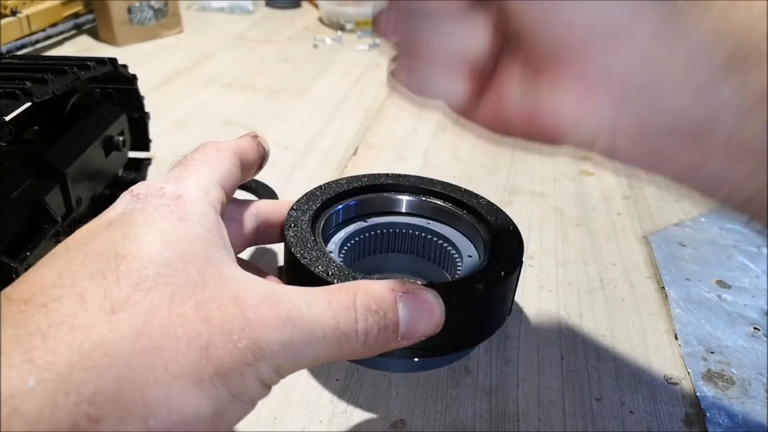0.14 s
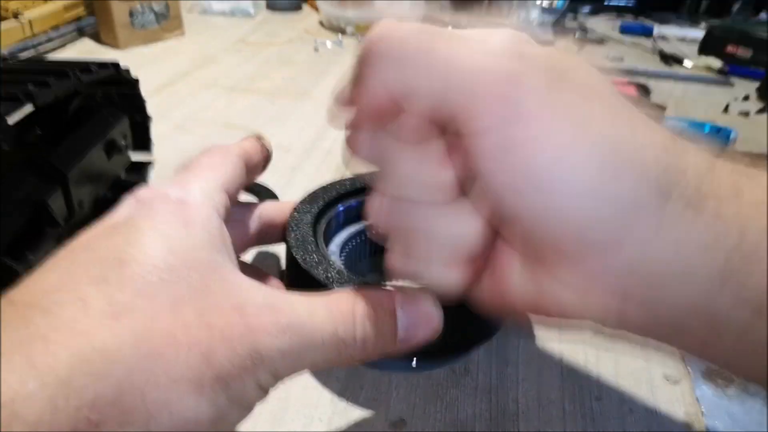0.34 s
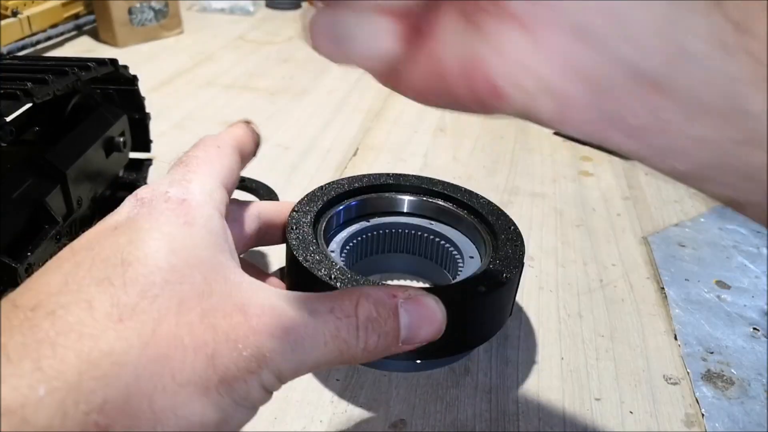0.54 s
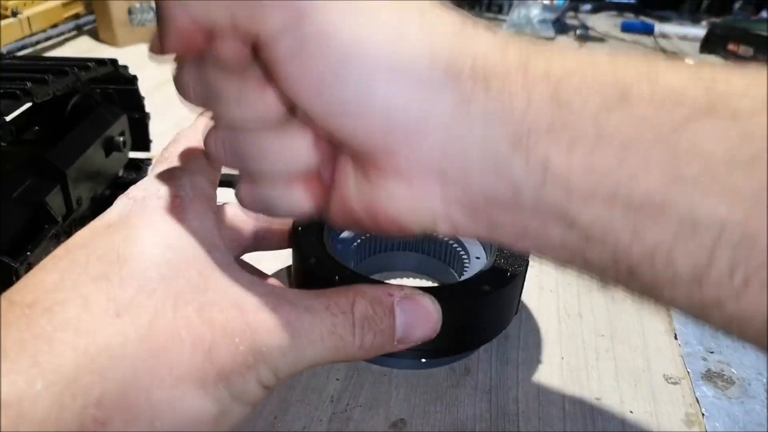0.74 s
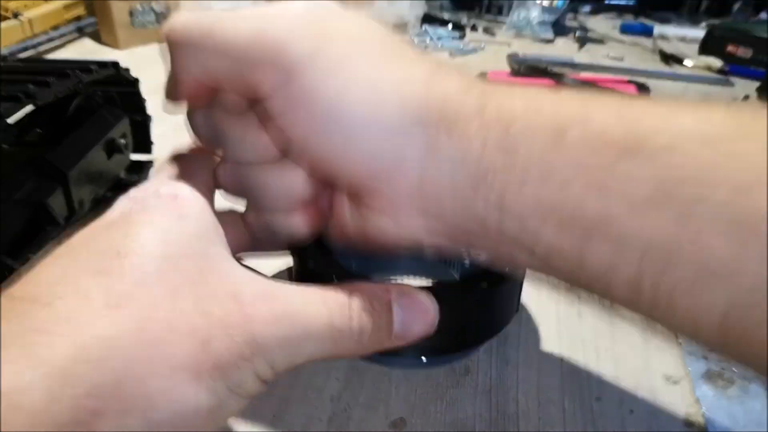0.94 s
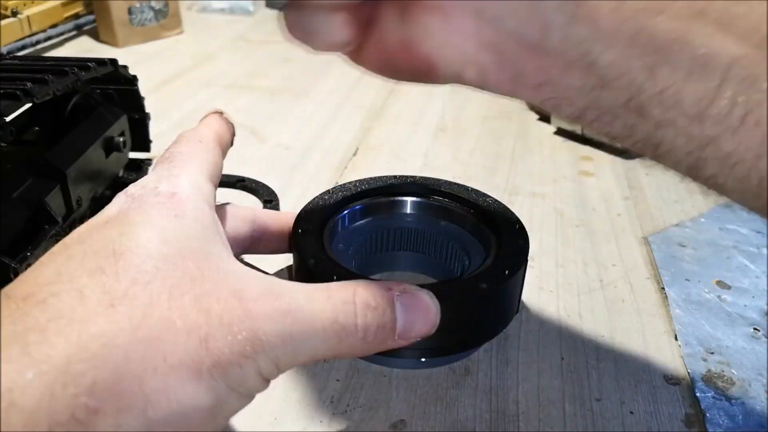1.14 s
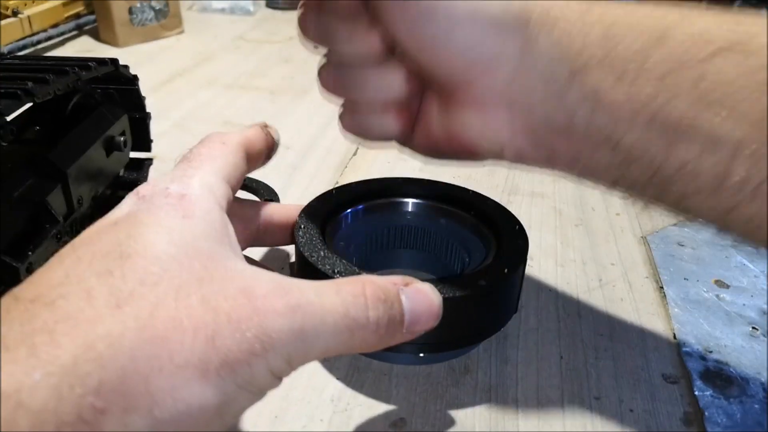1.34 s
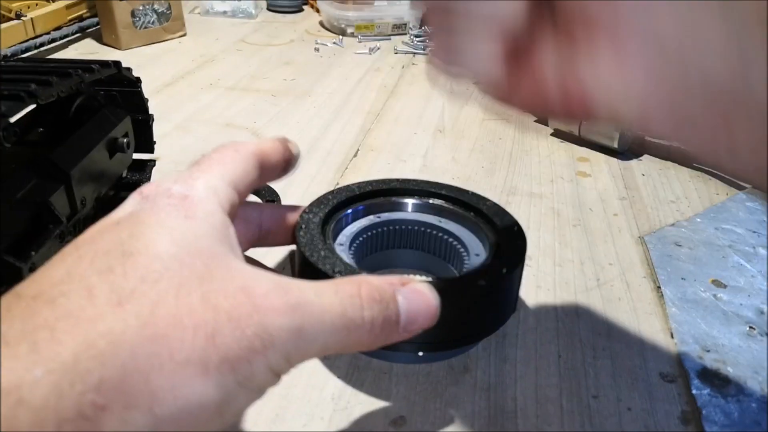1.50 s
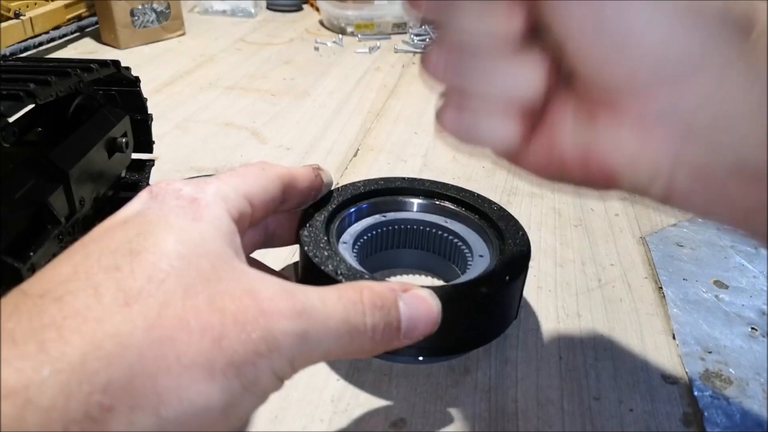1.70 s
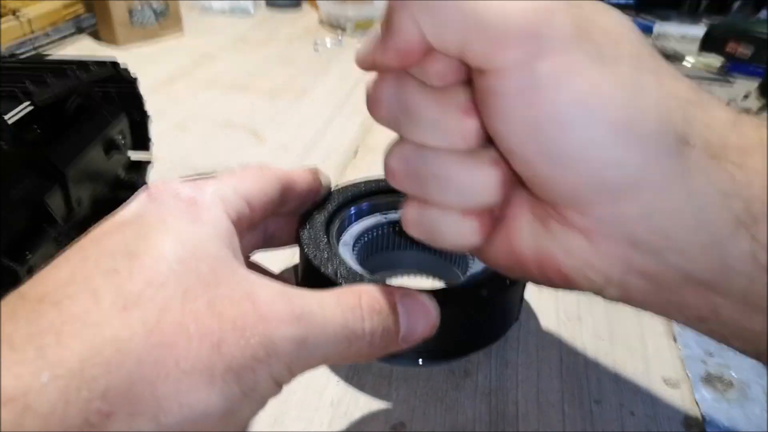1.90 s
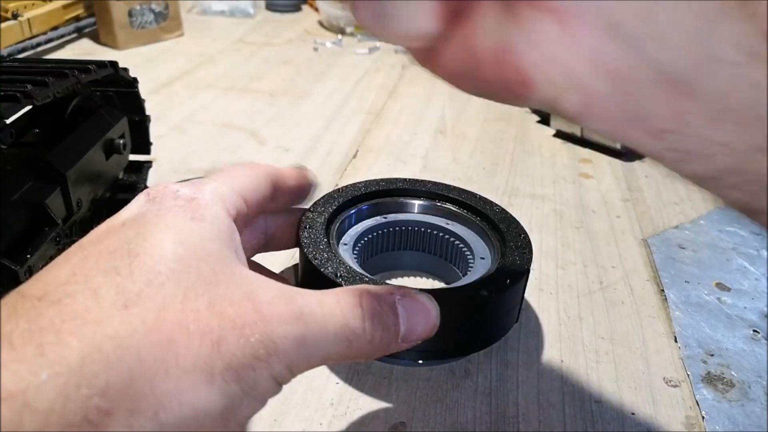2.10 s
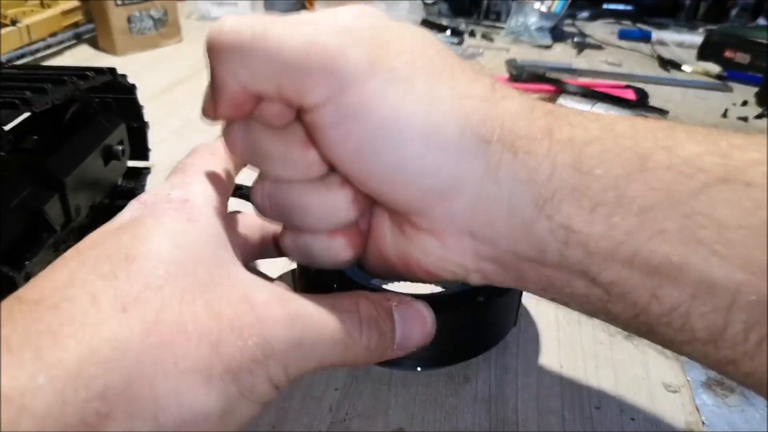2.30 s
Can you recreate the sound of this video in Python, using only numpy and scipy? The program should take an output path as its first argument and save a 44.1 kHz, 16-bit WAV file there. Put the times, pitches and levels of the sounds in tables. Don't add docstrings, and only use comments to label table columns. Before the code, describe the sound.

Fist pounding a hard plastic ring on a wooden workbench, close up in a garage: seven blows at about 0.2, 0.5, 0.83, 1.11, 1.41, 1.75 and 2.04 seconds. Each is a deep thud and hollow knock with a dry plastic crack, then rattling tools, small clinks and a short boomy tail. The last has the deepest thud and longest rattle. Faint skin rubbing and low rumble lie between.

```python
import sys
import numpy as np
from scipy import signal
from scipy.fft import rfft, irfft, next_fast_len
from scipy.io import wavfile
from scipy.ndimage import uniform_filter1d, map_coordinates

SR = 44100
rng = np.random.default_rng(int(sys.argv[2]) if len(sys.argv) > 2 else 0)


def nominal_scale(level):
    x = np.asarray(level, float) / 20
    return 10 ** x


def store_wav(level_fs):
    pcm = np.round(np.clip(np.atleast_2d(level_fs), -1, 1) * 32767)
    wavfile.write(sys.argv[1], SR, pcm.T.astype(np.int16))


N = 103635


def unit(x):
    return x / np.sqrt(np.mean(x ** 2) + 1e-20)


def along(points, hz):
    f, value = np.transpose(points)
    return np.interp(np.log(hz + 1), np.log(f + 1), value)


def octaves(hz):
    return np.log2((hz + 1) / 2000)


def since(s):
    return np.maximum(np.arange(N) / SR - s, 0)


def level(rows):
    return nominal_scale(np.interp(np.arange(N) / SR, *np.transpose(rows)))


def filtered(x, response):
    m = next_fast_len(N + SR // 2)
    return irfft(rfft(x, m) * response(np.fft.rfftfreq(m, 1 / SR)), m)[..., :N]


def wobble(rate):
    knots = rng.standard_normal(int(N / SR * 400) + 4)
    return map_coordinates(knots, [np.arange(N) * min(rate, 400) / SR])


def noise(spectrum, tilt_db=0, alike=None):
    # f/Hz, left-right likeness (correlation, 0 to 1)
    usual_likeness = [(100, 1), (300, 0.65), (600, 0.27), (2000, 0.14), (10000, 0.053)]
    likeness = alike or usual_likeness

    def mid_side_gain(hz):
        angle = np.arccos(np.clip(along(likeness, hz), -1, 1)) / 2
        colour_db = along(spectrum, hz)
        gain = nominal_scale(colour_db + tilt_db * octaves(hz) * (colour_db > -100))
        return gain * [np.cos(angle), np.sin(angle)]

    mid, side = filtered(rng.standard_normal((2, N)), mid_side_gain)
    return unit(np.array([mid + side, mid - side]))


def swing(s, db, hz, rise_s, power):
    u = since(s) / rise_s / power
    return -nominal_scale(db) * (u * np.exp(1 - u)) ** power * np.sin(2 * np.pi * hz * since(s))


def ringing(s, db, modes, attack_s):
    t = since(s)
    out = np.zeros(N)
    for hz, mode_db, t60 in modes:
        decay = nominal_scale(db + mode_db + rng.normal(0, 1.5) - 60 * t / t60)
        out += decay * np.sin(2 * np.pi * (hz * t + rng.random()))
    return out * (1 - np.exp(-t / attack_s))


def room(x, decay, size):
    hz, t, z = signal.stft(rng.standard_normal((2, SR // 2)), SR, nperseg=size)
    tail = signal.istft(z * nominal_scale(-60 * t / along(decay, hz)[:, None]), SR, nperseg=size)[1]
    return signal.fftconvolve(x[None], tail / np.linalg.norm(tail[0]), axes=1)[:, :N]


def ports(x):
    # f/Hz, left-right level/dB
    shading = [(300, 0.5), (650, 4), (1000, -3.5), (1500, -5), (2400, 3), (8000, 9)]
    lag_s = 0.0003043
    half = np.array([[.5], [-.5]])
    return filtered(x, lambda hz: np.exp(2j * np.pi * hz * lag_s * half) * nominal_scale(along(shading, hz) * half))


def background():
    # t/s, level/dB
    rub_levels = [(0, -61.5), (.1, -63.5), (.19, -67.5), (.31, -54), (.45, -65.5), (.62, -60), (.8, -67),
                  (.95, -65), (.985, -93), (1.1, -77.5), (1.26, -79), (1.33, -67), (1.42, -83),
                  (1.6, -74.5), (1.72, -70), (1.95, -71), (2.19, -65.5), (2.35, -72)]
    # f/Hz, density/dB per Hz
    skin_colour = [(320, -45.5), (550, -15), (951, -14.5), (1310, -16), (2200, -7.5), (2840, -18),
                   (4500, -20.5), (5500, -17), (6230, -23.5), (10800, -30), (14000, -56.5), (22000, -120)]
    # t/s, level/dB
    sway_levels = [(0.0, -51), (0.61, -44.5), (1.13, -48), (1.32, -42), (2.05, -43), (2.35, -44)]
    # f/Hz, density/dB per Hz
    rumble_colour = [(15, 17), (35, 31.5), (60, 15), (110, -35)]
    # t/s, level/dB
    stir_levels = [(0, -50), (.08, -68.5), (.19, -66), (.45, -65), (.8, -66.5), (1.0, -64.5), (1.1, -62.5),
                   (1.4, -58.5), (1.62, -55.5), (1.74, -68.5), (2.03, -62.5), (2.22, -53.5), (2.35, -69)]
    # f/Hz, density/dB per Hz
    air_colour = [(35, -37), (60, -10.5), (137, -6), (226, -14.5), (400, -18.5), (560, -30), (9000, -44.5),
                  (15500, -79.5)]
    rub = level(rub_levels) * nominal_scale(1.5 * wobble(39.3)) * noise(skin_colour)
    sway_hz = 22 + 1.5 * wobble(8)
    swaying = np.sin(2 * np.pi * np.cumsum(sway_hz) / SR)
    rumble = nominal_scale(-12.5) * noise(rumble_colour, alike=[(30, 1.0)])
    stand = level(sway_levels) * nominal_scale(6.5) * (swaying + rumble)
    return rub + stand + nominal_scale(3) * level(stir_levels) * noise(air_colour)


def tools():
    # first contact t/s, level/dB, loss/dB a contact
    rockings = [
        (.008, -53.5, 3.5),
        (.277, -47, 2.5),
        (.574, -39.5, 6.5),
        (.95, -47, 5),
        (1.183, -42, 5),
        (1.534, -51, 2),
        (1.82, -43, 6),
        (2.164, -50.5, 3),
    ]
    # f/Hz, level/dB, t60/s
    rocker_modes = [(732, 15, 0.03), (1670, -14, 0.029), (2210, -25, 0.028)]
    # t/s, level/dB, rise/s, t60/s, tilt/dB per octave
    shakes = [
        (0.206, -30.5, 0.0041, 0.16, 6),
        (0.508, -23.5, 0.0016, 0.17, 2.5),
        (0.827, -27.5, 0.0064, 0.18, 2),
        (0.927, -48, 0.0017, 0.068, 14.5),
        (1.113, -30, 0.0037, 0.15, 5),
        (1.411, -28, 0.0048, 0.2, 6.5),
        (1.746, -25, 0.0013, 0.19, 4),
        (2.043, -23.5, 0.011, 0.25, 6.5),
    ]
    # f/Hz, density/dB per Hz
    tool_colour = [(260, -33.5), (450, 8.5), (679, -3), (985, 5.5), (1240, -4), (1990, -1.5), (3090, -15.5),
                   (7620, -26), (10800, -41.5), (14000, -60), (22000, -120)]
    # t/s, f/Hz, level/dB, t60/s
    clinkings = [(0.5112, 1995, -13, 0.024), (0.5122, 4600, -19.5, 0.03), (1.751, 2490, -19.5, 0.033),
                 (0.836, 940, -26.5, 0.025), (2.051, 2400, -31, 0.14), (2.053, 7820, -21.5, 0.037),
                 (2.066, 6300, -46, .04), (1.113, 770, -33, 0.051), (1.112, 3700, -26, 0.029),
                 (1.6, 2200, -37.5, .025), (2.058, 5970, -34, 0.15), (2.091, 3400, -41, 0.065)]
    out = np.zeros((2, N))
    for s, db, rise_s, t60, tilt_db in shakes:
        t = since(s)
        decay = nominal_scale(db - 60 * t / t60 + 2 * wobble(300))
        out += decay * (1 - np.exp(-(t / rise_s) ** 2)) * noise(tool_colour, tilt_db)
    clinks = sum(ringing(s, db, [(hz, 0, t60)], attack_s=0.00079) for s, hz, db, t60 in clinkings)
    rocking = np.zeros(N)
    for s, db, loss_db in rockings:
        for k in range(4):
            rocking += ringing(s + k * .052, db - k * loss_db, rocker_modes, attack_s=0.013)
    return out + ports(clinks + rocking)


def knock(s, db, hz, peak_s):
    u = since(s) / peak_s
    return -nominal_scale(db) * (u * np.exp((1 - u * u) / 2)) ** 2.5 * np.sin(2 * np.pi * hz * since(s))


def bench():
    # t/s, thud level/dB, thud f/Hz
    blows = [
        (.1975, -19, 73),
        (.5045, -10, 64),
        (.82, -19, 47),
        (1.1075, -15, 70),
        (1.406, -18, 66),
        (1.7428, -13, 62),
        (2.0362, -5.5, 66),
    ]
    ring_down_db = [-9, -14, -12.5, -10.5, -12, -6, -7]
    landing_db = [-14.5, -8, -26, -11, -8, -5, -6]
    # t/s, level/dB, f/Hz, peak after/s
    flexings = [(.2003, -3, 205, .006), (.508, -20, 330, .006), (.8278, -13, 235, .008),
                (1.1097, -4.5, 215, .0065), (1.4095, -9.5, 225, .006), (1.746, -4, 205, .007),
                (2.0405, -10, 240, .0065)]
    # t/s, level/dB, f/Hz, build-up/s
    rebounds = [
        (0.53, -16, 134, 0.0028),
        (1.125, -22.5, 235, 0.0037),
        (1.14, -22.5, 218, 0.0032),
        (1.437, -18, 231, 0.00099),
        (1.784, -10.5, 299, 0.00168),
        (2.0665, -11.5, 270, .0012),
    ]
    # f/Hz, level/dB, t60/s
    bench_modes = [(52.67, -15.5, 0.41), (112.8, -17, 0.24), (158.1, -18.5, 0.27), (200.3, -14, 0.26),
                   (231, -24, 0.21), (293.9, -20.5, 0.18), (354, -21, .2), (414.8, -19.5, 0.099)]
    # f/Hz, t60/s
    boom_decay = [(30, 0.57), (150, 0.42), (500, 0.75)]
    out = np.zeros((2, N))
    dry_knocks = sum(knock(*row) for row in flexings)
    for (s, thud_db, thud_hz), ring_db, hand_db in zip(blows, ring_down_db, landing_db):
        thud = swing(s, thud_db, thud_hz, .006, power=1.57)
        after = ringing(s + 0.01399, ring_db, bench_modes, attack_s=0.0021)
        push = swing(s, ring_db, 186, 0.0023, power=0.91)
        mid, side = room(thud + push, boom_decay, size=1024)
        out += ports(thud + after) + nominal_scale(-9.5) * (mid + 0.24 * side * np.array([[1], [-1]]))
        dry_knocks = dry_knocks + knock(s + .0022, hand_db, 165, .003)
    drops = sum(swing(s, db, hz, rise_s, power=1.87) for s, db, hz, rise_s in rebounds)
    return out + ports(dry_knocks + drops)


def burst(shape, tilt_db):
    # f/Hz, density/dB per Hz
    ring_colour = [(350, -3.5), (600, 2), (792, 3.5), (2920, -1), (3590, -12.5), (5410, -12), (6890, -19),
                   (9200, -18.5), (10800, -43.5), (14500, -45.5), (22000, -120)]
    a, b = rng.standard_normal((2, N))
    z = rfft(shape * np.array([a + 0.51 * b, a - 0.78 * b]))
    hz = np.fft.rfftfreq(N, 1 / SR)
    even_hz = 500
    lumps = uniform_filter1d(np.abs(z) ** 2, size=int(even_hz * N / SR), axis=1)
    z = z / np.sqrt(np.abs(lumps) + 1e-20)
    out = irfft(z * nominal_scale(along(ring_colour, hz) + tilt_db * octaves(hz)), N)
    return out * np.linalg.norm(shape) / np.linalg.norm(out[0])


def ring():
    # t/s, f/Hz, level/dB, t60/s
    ring_tones = [(.2015, 620, -18, 0.015), (0.206, 1070, -16.5, 0.015), (.2045, 1305, -22, 0.023),
                  (.2055, 5160, -25, .012), (.513, 9140, -35, 0.016), (.513, 7640, -34, 0.019),
                  (.513, 5630, -29.5, 0.012), (0.2083, 2590, -26.5, 0.045), (0.2041, 3500, -25.5, .008),
                  (.2058, 9160, -19, .01), (.5125, 1070, -13, 0.015), (.5125, 670, -20.5, 0.024),
                  (.521, 2000, -29.5, 0.031), (.529, 950, -36, 0.023), (.835, 595, -19, 0.037),
                  (0.834, 1284, -16, 0.017), (1.1113, 1886, -16, 0.031), (1.112, 2813, -18, 0.02),
                  (1.114, 4360, -23, .015), (1.112, 1210, -11.5, 0.0069), (1.143, 2100, -42.5, 0.054),
                  (1.413, 1940, -9, 0.023), (1.415, 2790, -14, 0.014), (1.414, 5430, -13, 0.012),
                  (1.414, 1366, -27, 0.015), (1.748, 1003, -18.5, 0.019), (1.75, 1840, -20, 0.033),
                  (1.75, 2980, -17, .015), (1.75, 5630, -20, 0.016), (2.041, 698, -24, 0.029),
                  (2.041, 1068, -23.5, 0.036), (2.043, 1740, -24.5, 0.018)]
    # t/s, peak level/dB, spread/s, tilt/dB per octave
    cracks = [(0.2027, -21.5, 0.00066, 5.5), (.2063, -12, 0.00079, 5), (.229, -30, 0.00146, 1),
              (0.51, -30.5, 0.00086, -4), (0.5124, -25, 0.00072, -4.5), (0.5148, -16, 0.00058, -3),
              (0.525, -28.5, 0.0013, 2.5), (0.542, -33, 0.0018, 3), (0.829, -31, 0.00058, 1.5),
              (.8365, -12, .0012, -1.5), (.874, -40, 0.0012, 2), (.928, -36.5, 0.00045, 5),
              (.911, -47, .001, 9), (1.06, -55, 0.0012, -0.5), (1.147, -37.5, .003, 4.5),
              (1.245, -55, .003, -2.5), (1.595, -58, 0.0038, 3), (1.441, -39, .002, -0.5),
              (1.788, -30.5, .002, -3), (1.1126, -28.5, 0.0017, 1), (1.1148, -13, .0015, 3),
              (1.122, -29, .001, 0.5), (1.41, -21.5, 0.00055, 0.5), (1.4142, -8, .0007, 3),
              (1.7471, -18, .0015, -3.5), (1.752, -14, 0.00136, 2.5), (1.937, -56, 0.0053, .6),
              (2.04, -27, 0.0013, -1.5), (2.044, -20, 0.00096, 1), (2.068, -21.5, 0.0013, 4),
              (2.0755, -22.5, 0.0013, 1.5)]
    # f/Hz, t60/s
    garage_decay = [(500, 0.27), (2500, 0.33), (10000, 0.23)]
    garage_db, crack_t60_s = -13, 0.018
    out, t = np.zeros((2, N)), np.arange(N) / SR
    for s, db, spread, tilt_db in cracks:
        contact = np.exp(-.5 * ((t - s) / spread) ** 2)
        tail = 0.23 * (t > s) * nominal_scale(-60 * since(s) / crack_t60_s)
        crack = nominal_scale(db - 2.5) * burst(contact + tail, tilt_db)
        out += ports(crack) + nominal_scale(garage_db) * room(crack[0], garage_decay, size=256)
    tones = sum(ringing(s, db + 3, [(hz, 0, t60)], attack_s=0.0008) for s, hz, db, t60 in ring_tones)
    return out + ports(tones) + nominal_scale(garage_db - 2.5) * room(tones, garage_decay, size=256)


def scene():
    return background() + tools() + bench() + ring()


def low_pass(x):
    return signal.sosfilt(signal.butter(12, 15700, fs=SR, output="sos"), x)


def record(dry):
    low_cut_hz, ceiling = 12, 1.62
    dry = filtered(dry, lambda hz: 1j * hz / (low_cut_hz + 1j * hz))
    mix = dry / (1 + np.abs(dry / ceiling) ** 6) ** (1 / 6)
    return low_pass(mix)


dry = scene()
out = record(dry)
store_wav(out)
```